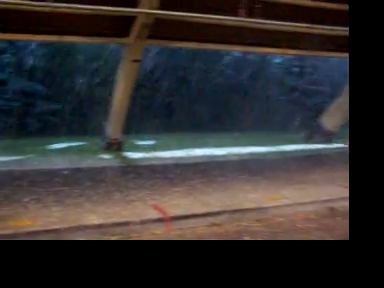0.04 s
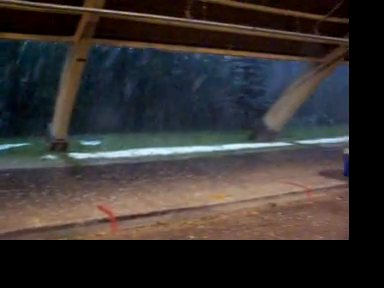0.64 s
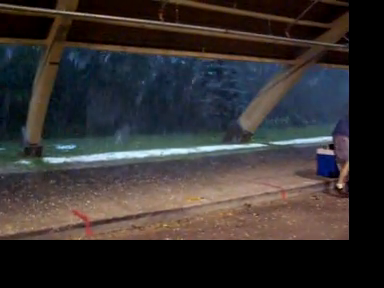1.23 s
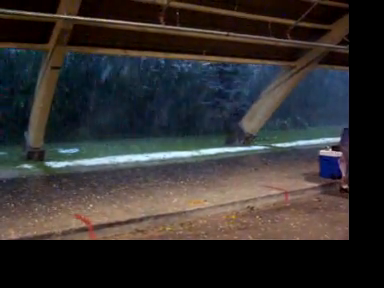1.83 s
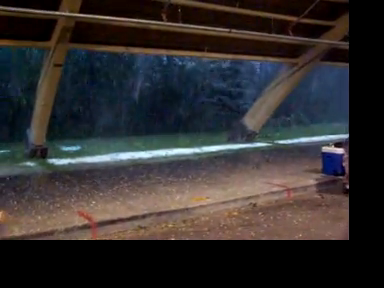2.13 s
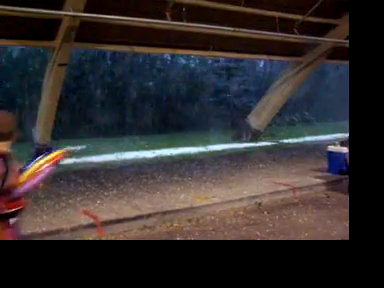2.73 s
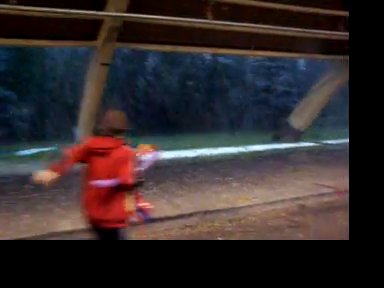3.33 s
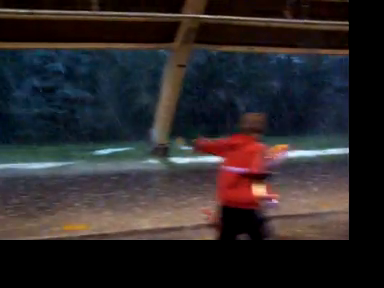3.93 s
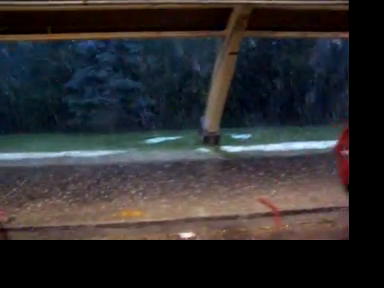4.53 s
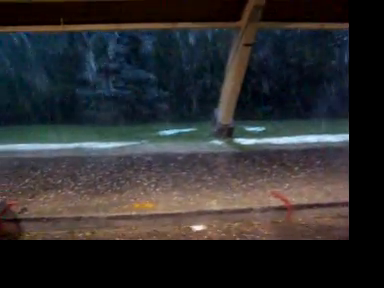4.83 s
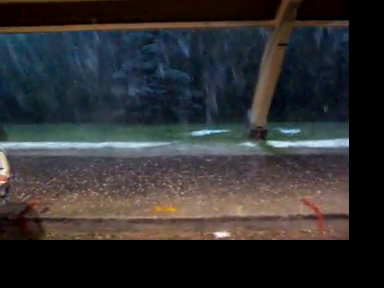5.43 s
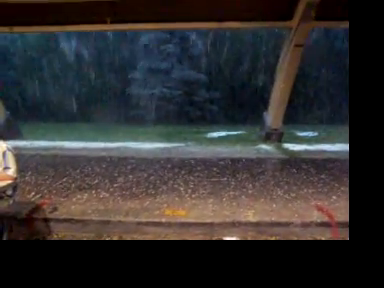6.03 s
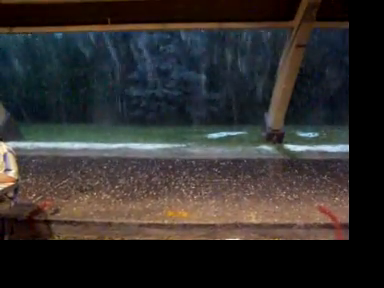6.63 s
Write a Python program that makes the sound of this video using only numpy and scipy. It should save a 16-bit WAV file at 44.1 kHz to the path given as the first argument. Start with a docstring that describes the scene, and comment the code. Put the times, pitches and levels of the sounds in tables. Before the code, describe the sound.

Heard from beneath an open shelter, hailstones clatter across the roof so thickly that they form one steady, hissing roar. Rain washes the ground outside, and larger stones add a soft, low drumming overhead. It all echoes briefly between roof and concrete floor, dipping a little before growing slightly stronger. The mono microphone gives the sound a faintly rough edge.

```python
"""Under the roof of an open pavilion, in heavy hail and rain.
Thousands of stones a second ring the roof and merge into a bright roar, heavy ones drum the deck,
and both echo between roof and concrete floor. Rain hisses on the ground outside.
The downpour eases slightly, then builds. The overloaded mono recorder clips,
and its slow sampling mirrors the top of the hiss."""
import sys
import numpy as np
from scipy import signal
from scipy.fft import rfft, irfft
from scipy.io import wavfile

SR = 44100
rng = np.random.default_rng(int(sys.argv[2]) if len(sys.argv) > 2 else 0)


def wav_out(sig):
    """Save sig, one row per channel (or a flat mono array), as 16-bit PCM at SR to the path in sys.argv[1]."""
    wavfile.write(sys.argv[1], SR, np.round(np.clip(np.atleast_2d(sig).T, -1, 1) * 32767).astype(np.int16))


N = 295470
TIME_S, FREQ_HZ = np.arange(N) / SR, np.fft.rfftfreq(N, 1 / SR)


def gain(db):
    """dB to amplitude factor."""
    return 10 ** (np.asarray(db) / 20)


def unit_rms(x):
    """Scale to rms 1."""
    return x / np.sqrt(np.mean(x ** 2) + 1e-20)


def equalise(x, curve):
    """Filter by a (f/Hz, level/dB) curve; output rms 1."""
    hz, db = np.transpose(curve)
    response_db = np.interp(np.log(FREQ_HZ + 1), np.log(hz), db)
    return unit_rms(irfft(rfft(x) * gain(response_db), N))


def low_pass(x, edge_hz):
    """Steep FIR low-pass."""
    return signal.oaconvolve(x, signal.firwin(511, edge_hz, window=("kaiser", 9), fs=SR), "same")


def panel_impacts(stones, low_hz, high_hz, ring_s, spread_db, samples):
    """Each stone rings its own spot at its own pitch; most are small or far, a few large or near."""
    onset, pitch, weight, decay, polarity = rng.random((stones, 5)).T[:, :, None]
    t = np.arange(samples) / SR
    blow = gain(spread_db * np.minimum(-np.log(1 - weight), 4)) * np.sign(polarity - .5)
    hz = low_hz + pitch * (high_hz - low_hz)
    rings = blow * np.exp(-t / (ring_s * (.5 + decay))) * np.sin(2 * np.pi * hz * t)
    index = (onset * (N + samples)).astype(int) + np.arange(samples)
    summed = np.bincount(index.ravel(), rings.ravel(), N + 2 * samples)
    return unit_rms(summed[samples:samples + N])


def pavilion_reverb(panels, t60_s, wet_db=2, predelay_s=.008):
    """Reflections between roof and concrete floor, by separate paths for each panel."""
    t = np.arange(SR // 3) / SR
    mix = np.zeros(N)
    for panel in panels:
        tail = rng.standard_normal(len(t)) * gain(-60 * t / t60_s) * (t > predelay_s)
        wet = unit_rms(irfft(rfft(panel) * rfft(tail, N), N))
        mix += panel + gain(wet_db) * wet
    return mix


# Roof response to small stones: f/Hz, level/dB
ROOF_EQ = [(200, -28), (450, -13), (620, -12), (850, -11), (1400, -12), (2000, -9.5), (2500, -4.5),
           (3200, -2.5), (4000, -1.2), (4900, 0.66), (5600, -1), (6400, -9), (7200, -13), (8000, -23.5)]

def roof_clatter(mix_db=-2.5, panel_count=14):
    """Small stones strike every roof panel in dense, short ticks."""
    panels = [panel_impacts(stones=1800, low_hz=101, high_hz=8560, ring_s=.00076,
                            spread_db=1.47, samples=224) for _ in range(panel_count)]
    return gain(mix_db) * equalise(pavilion_reverb(panels, t60_s=.74), ROOF_EQ)


# Deck response to heavy stones: f/Hz, level/dB
DECK_EQ = [(12, -39), (25, -19), (48, -10.5), (80, -9.5), (125, -4.5), (165, 0.5), (200, -1.5), (260, 2),
           (330, -2), (430, -7.5), (620, -1.5), (900, -16), (2000, -47.5)]

def deck_drum(mix_db=-21, panel_count=8):
    """Heavy stones thump the roof deck: lower, longer rings."""
    panels = [panel_impacts(stones=600, low_hz=16, high_hz=1298, ring_s=.0086,
                            spread_db=1.1, samples=1280) for _ in range(panel_count)]
    return gain(mix_db) * equalise(pavilion_reverb(panels, t60_s=.8), DECK_EQ)


# Spectrum of rain and hail on the ground outside: f/Hz, level/dB
GROUND_SPECTRUM = [(30, -30), (300, -14.5), (1200, -7.5), (3000, -1.5), (5000, -2), (6500, -5.5),
                   (8000, -29.5)]

def ground_wash(mix_db=-5):
    """Distant drops blur into a smooth hiss."""
    return gain(mix_db) * equalise(rng.standard_normal(N), GROUND_SPECTRUM)


# Downpour strength: t/s, level/dB
DOWNPOUR = [(0.17, -12.5), (2.84, -13.5), (4.74, -12), (6.38, -12), (6.6, -12.5)]

def scene(trim_db=1.49, hiss_db_per_db=1.07, drum_db_per_db=.56, treble_hz=6000, treble_db=1.2):
    """Downpour strength drives all layers; the drumming follows only in part."""
    strength_db = np.interp(TIME_S, *np.transpose(DOWNPOUR))
    mean_db = strength_db.mean()
    surge_db = strength_db - mean_db
    hiss = roof_clatter() + ground_wash()
    treble = irfft(rfft(hiss) * FREQ_HZ ** 4 / (FREQ_HZ ** 4 + treble_hz ** 4), N)
    hiss += treble * (gain(treble_db + surge_db) - 1)  # harder blows are shorter, so brighter
    roar = hiss * gain(hiss_db_per_db * surge_db) + deck_drum() * gain(drum_db_per_db * surge_db)
    return np.tile(gain(mean_db + trim_db) * roar, (2, 1))


def record(dry, sampling_hz=16000, rolloff_db_per_khz2=15, bass_cut_hz=40, edge_hz=9100):
    """Asymmetric input clipping, treble mirrored about half the sampling rate, then band limits."""
    clipped = low_pass(np.clip(dry[0], -.41, .485), sampling_hz / 2)
    mirrored = clipped * (1 + 2 * np.cos(2 * np.pi * sampling_hz * TIME_S))
    above_knee_khz = np.maximum(FREQ_HZ - 7500, 0) / 1000
    rolloff = gain(-rolloff_db_per_khz2 * above_knee_khz ** 2)
    bass_cut = FREQ_HZ ** 2 / (FREQ_HZ ** 2 + bass_cut_hz ** 2)
    filtered = irfft(rfft(mirrored) * rolloff * bass_cut, N)
    return np.tile(low_pass(filtered, edge_hz), (2, 1))


dry = scene()
out = record(dry)
wav_out(out)
```